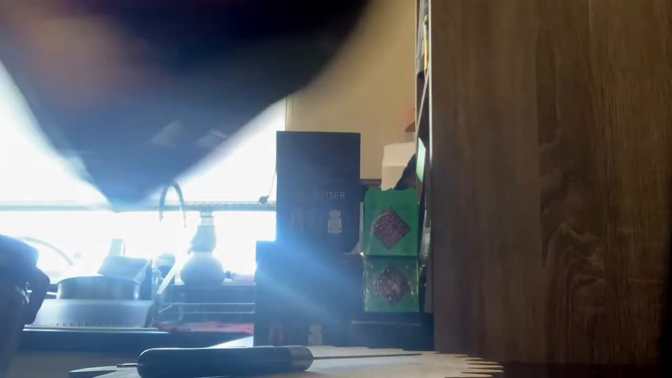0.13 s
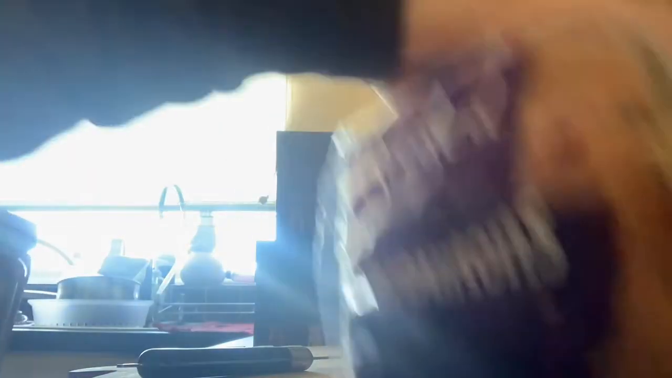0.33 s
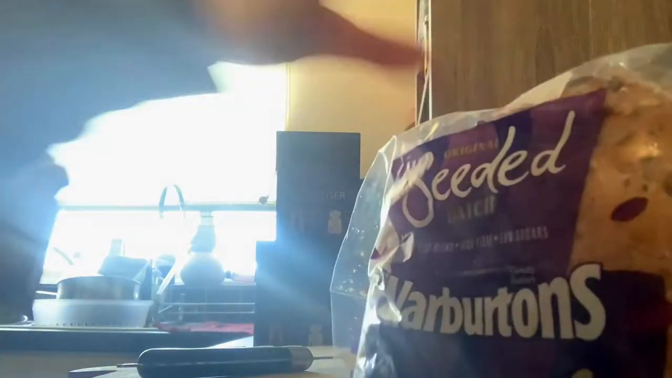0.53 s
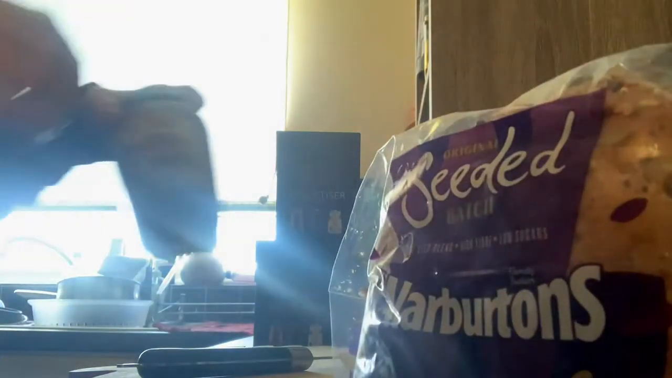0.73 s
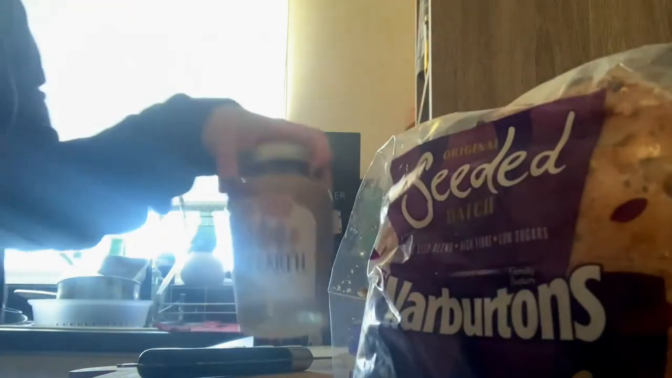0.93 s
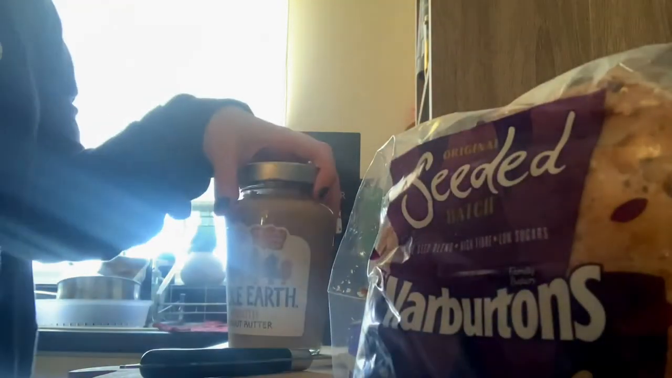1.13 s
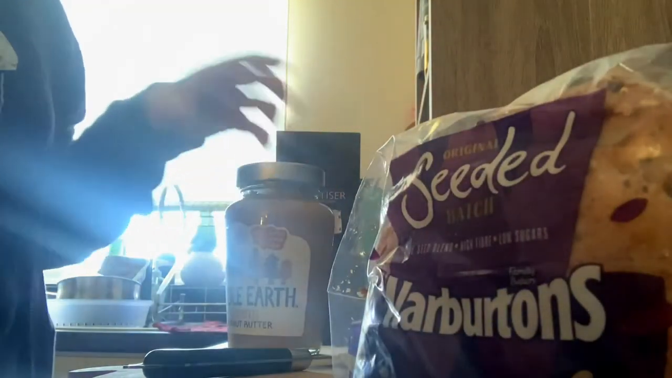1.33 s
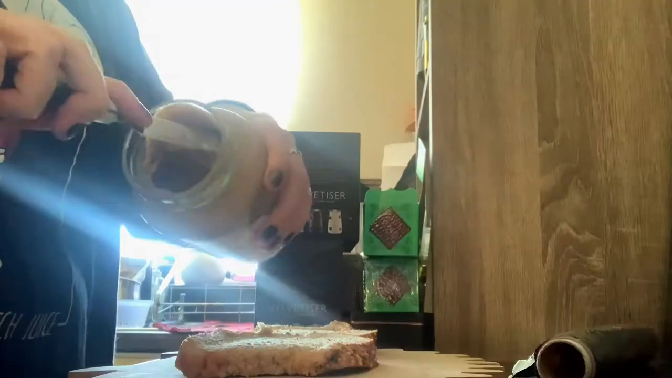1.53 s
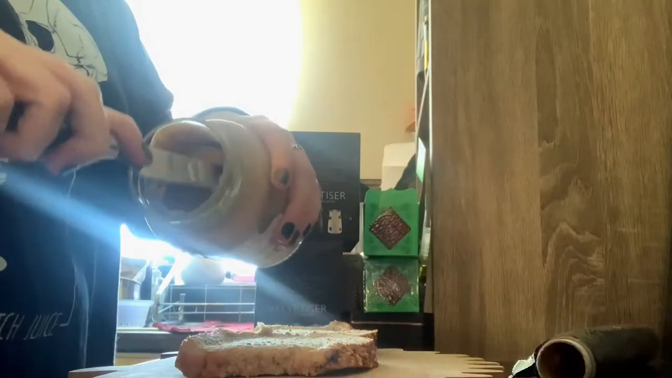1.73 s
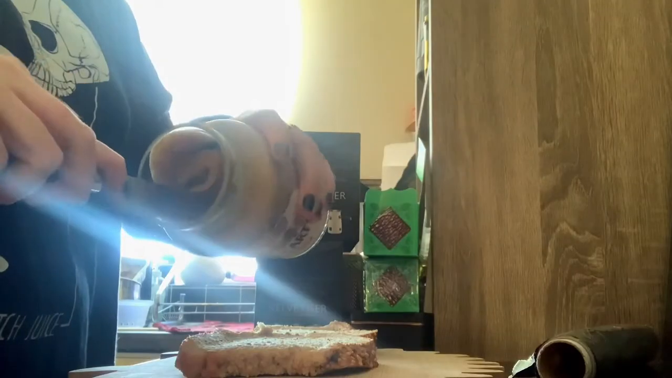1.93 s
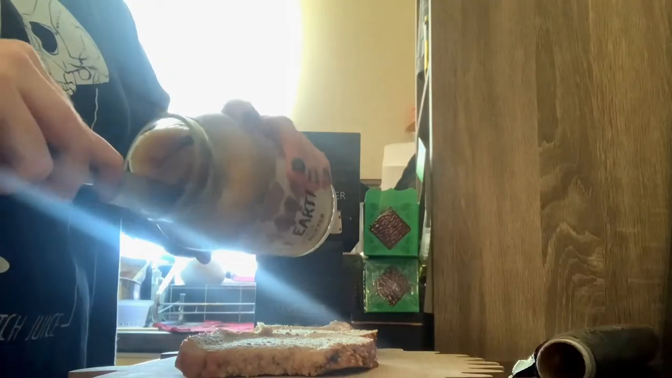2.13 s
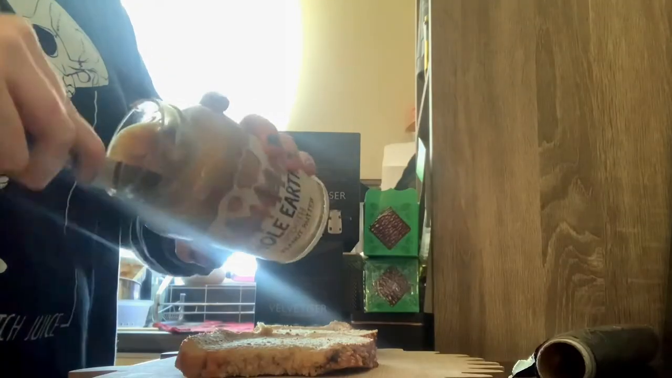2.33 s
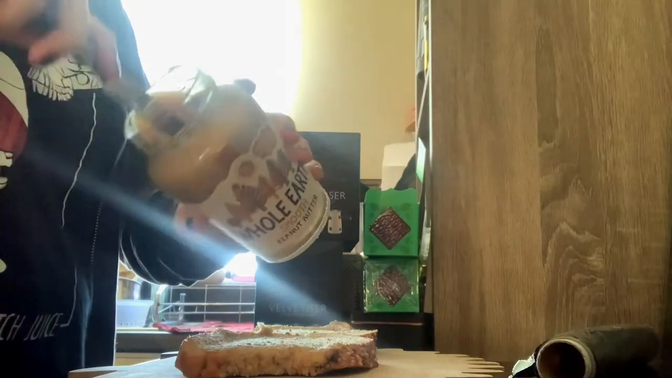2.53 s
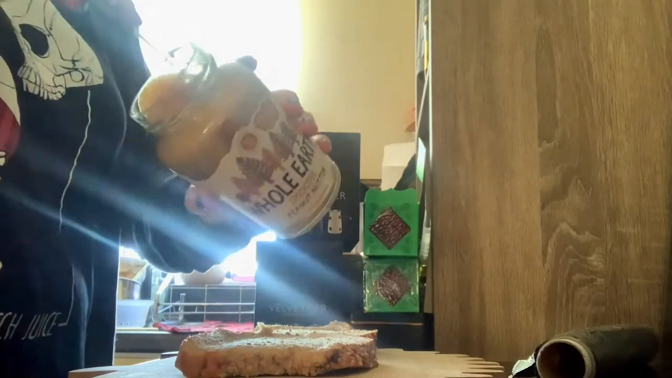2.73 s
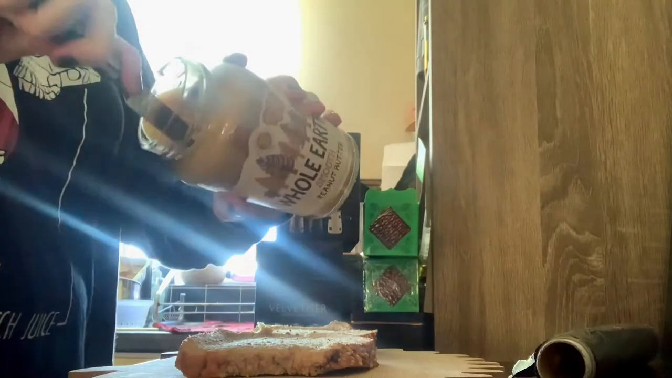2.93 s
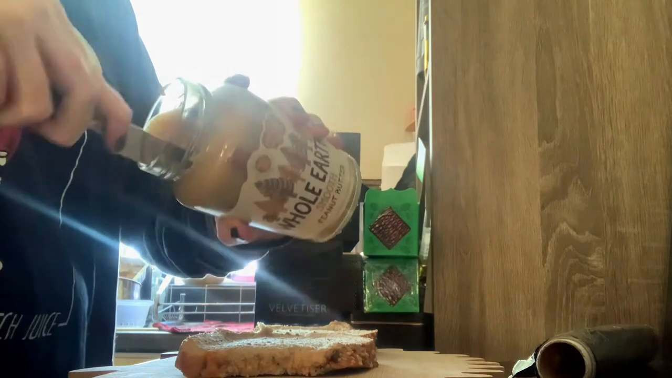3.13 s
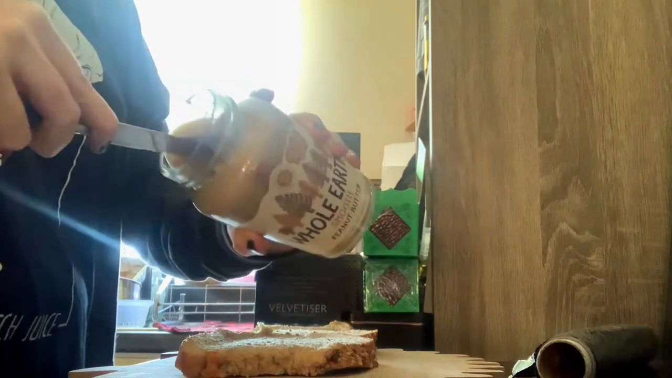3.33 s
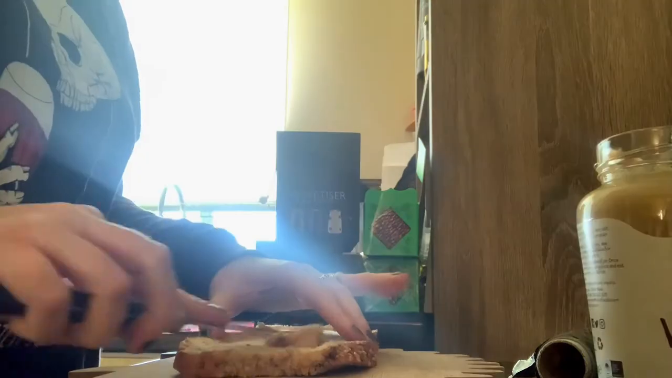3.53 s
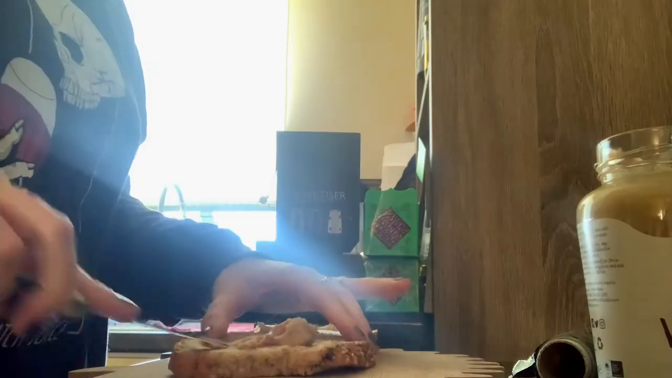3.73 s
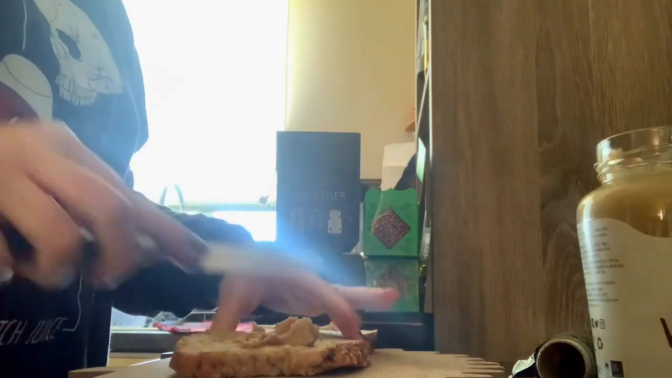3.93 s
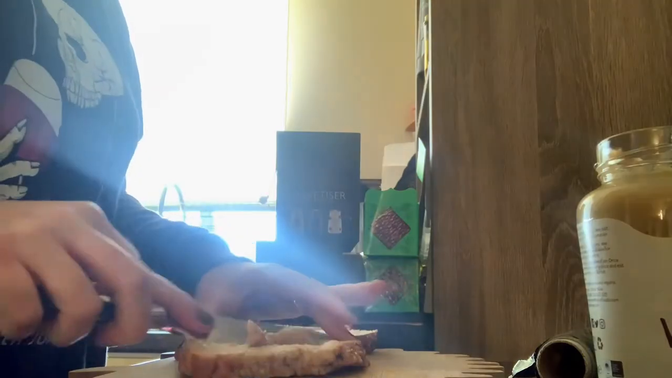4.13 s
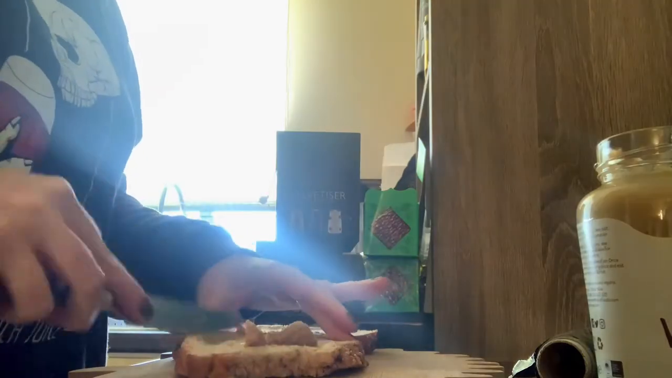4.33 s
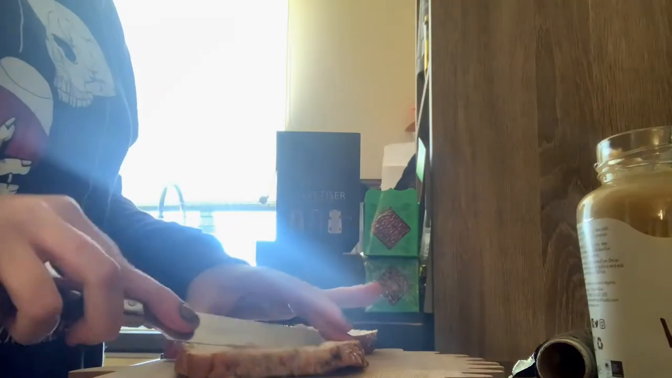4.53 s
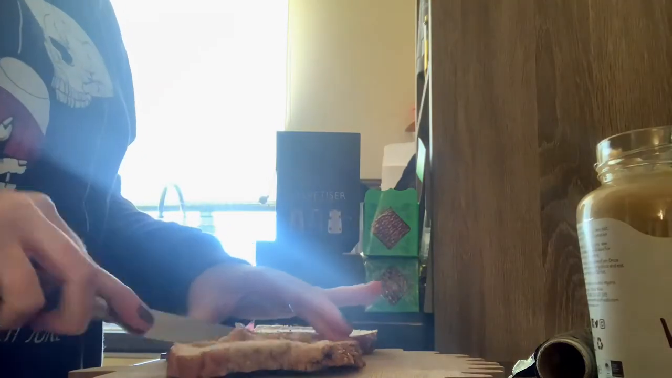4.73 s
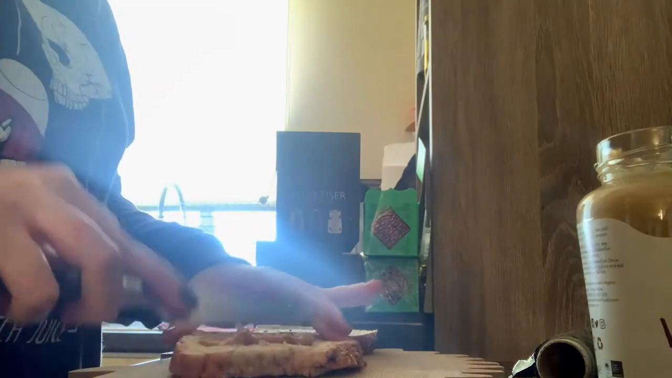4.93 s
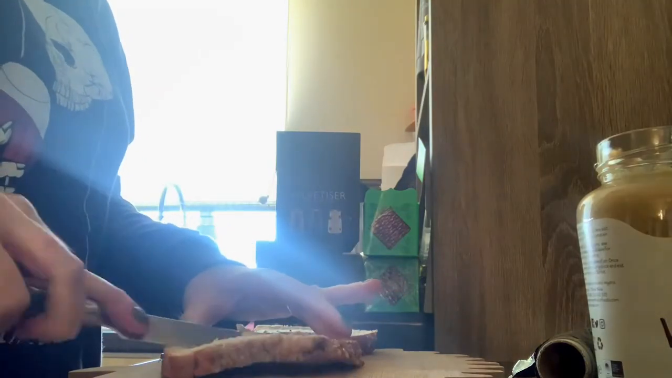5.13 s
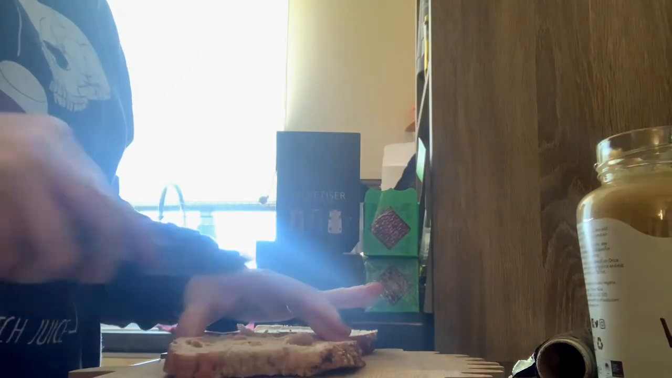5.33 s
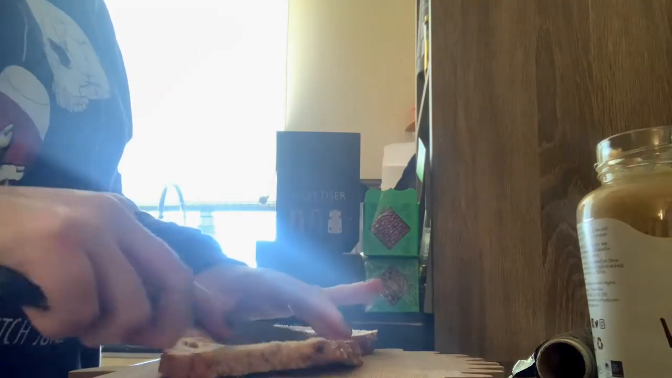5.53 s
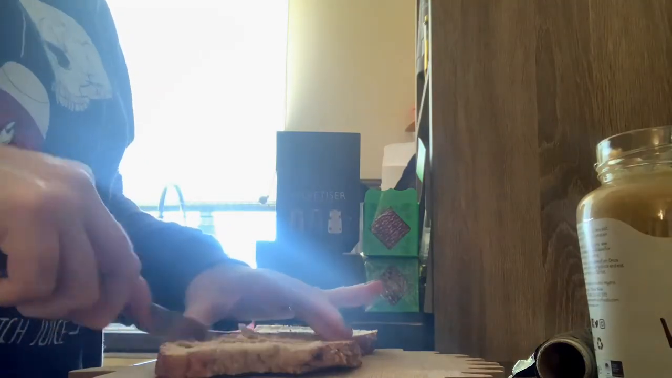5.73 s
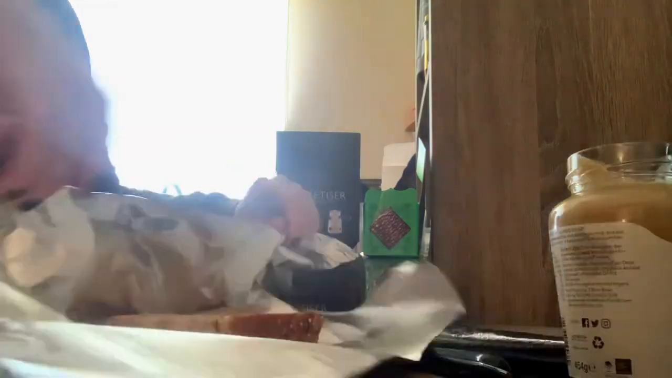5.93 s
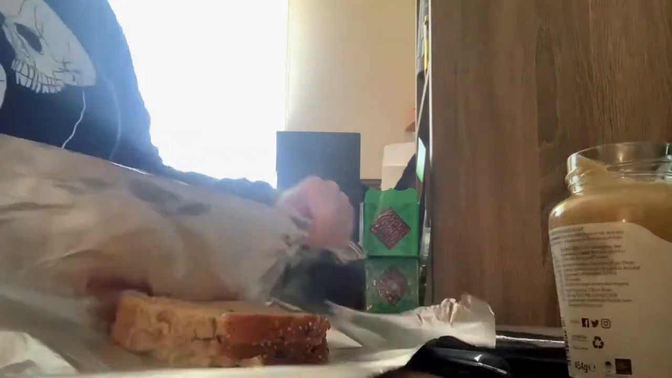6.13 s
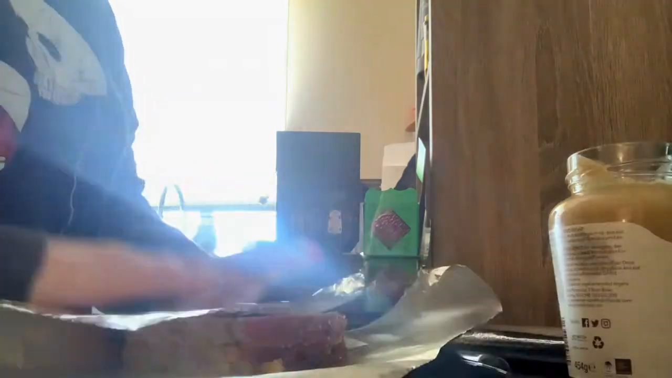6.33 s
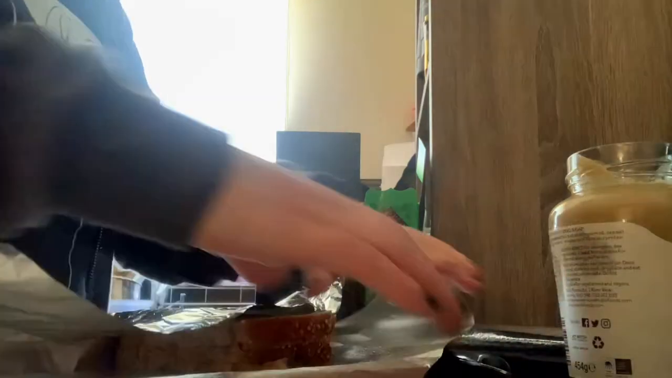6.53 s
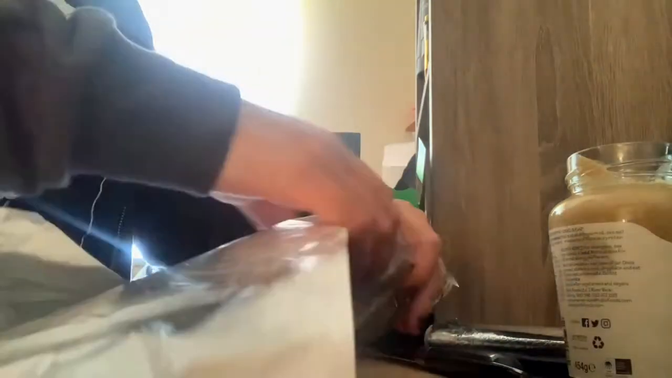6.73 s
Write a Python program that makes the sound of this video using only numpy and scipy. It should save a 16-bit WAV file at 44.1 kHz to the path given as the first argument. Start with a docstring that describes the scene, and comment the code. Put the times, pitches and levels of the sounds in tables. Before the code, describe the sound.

Close kitchen counter sounds: plastic rustle, hard jar thud and rattle, sparse knife clinks, very quiet spreading with light bumps, and crisp foil crumpling.

```python
"""A sandwich is made on a wooden counter, close to the two microphone ports of a phone. A bread bag rustles
(snapping creases in noise) and drops, then a full glass jar lands hard and rocks (ringing modes of the counter).
A knife clinks and scrapes in the jar (dry cracks with weaker short rings), then spreads quietly on bread
(soft crackle, squeaky noise tones) among light thumps; last, foil crackles by snapping creases.
Throughout, a small hard kitchen rings after each sound (a tail of echoes) over a low appliance drone (noise)."""
import sys
import numpy as np
from scipy import signal
from scipy.fft import rfft, irfft
from scipy.io import wavfile

SR = 44100
rng = np.random.default_rng(int(sys.argv[2]) if len(sys.argv) > 2 else 0)


def transcribe(u):
    """Save the signal u as a 16-bit wav file named by the first command-line argument.

    u: samples, shape (n,) or (channels, n), limited to [-1, 1]; the rate is SR.
    q: integer samples, one column per channel.
    """
    v = np.clip(np.atleast_2d(u).T, -1, 1)
    q = np.round(v * 32767).astype(np.int16)
    wavfile.write(sys.argv[1], SR, q)


N = 303408  # samples

PORT_LAG_US = 22.4  # the sound reaches the left port first
MODE_SPREAD_DB, MODE_DETUNE = 2.0, 0.016  # scatter of each mode from blow to blow: level, share of its pitch
BAG_PAN_DB = -1  # every pan is left minus right


def undb(db):
    """Decibels to amplitude."""
    return 10 ** (np.asarray(db) / 20)


def unit(x):
    """Scale to an RMS of 1, over both ports together."""
    return x / np.sqrt(np.mean(x ** 2))


def peak(x):
    """Scale to a peak of 1."""
    return x / np.abs(x).max()


def colour(x, points, tilt_db=0.0):
    """Filter by (pitch_hz, gain_db) points, tilted by tilt_db per octave about 4 kHz."""
    hz = np.maximum(np.fft.rfftfreq(x.shape[-1], 1 / SR), 1)
    point_hz, point_db = np.transpose(points)
    gain_db = np.interp(np.log(hz), np.log(point_hz), point_db) + tilt_db * np.log2(hz / 4000)
    return irfft(rfft(x) * undb(gain_db), x.shape[-1])


def ports(x, pan_db=0.0, lag_us=PORT_LAG_US):
    """One sound at the two microphone ports: the right one hears it lag_us later."""
    hz = np.fft.rfftfreq(len(x), 1 / SR)
    late = irfft(rfft(x) * np.exp(-2j * np.pi * hz * lag_us * 1e-6), len(x))
    return np.array([x * undb(pan_db / 2), late * undb(-pan_db / 2)])


def add(out, start_s, x):
    """Mix a two-port sound into out, cut off at the end."""
    i = int(start_s * SR)
    out[:, i:i + x.shape[1]] += x[:, :N - i]


def ring(modes, push, seconds):
    """Decaying modes driven by a short push; every blow lands on another spot; peak 1."""
    hz, db, t60 = np.transpose(modes)[:, :, None]
    level_chance, pitch_chance = rng.standard_normal((2, len(modes), 1))
    t = np.arange(int(seconds * SR)) / SR
    decay = undb(db + MODE_SPREAD_DB * level_chance - 60 * t / np.maximum(t60, 0.004))
    free = decay * np.sin(2 * np.pi * hz * (1 + MODE_DETUNE * pitch_chance) * t)
    return peak(signal.fftconvolve(free.sum(0), push)[:len(t)])


def chatter(rise_ms, fall_ms, seconds, points=((100, 0), (200, 0))):
    """Rough contact: a burst of coloured noise that swells and dies within milliseconds."""
    ms = np.arange(int(seconds * SR)) * 1000 / SR
    noise = colour(rng.standard_normal(len(ms)), points)
    return noise * (1 - np.exp(-ms / rise_ms)) * np.exp(-ms / fall_ms)


def crackle(curve, points, rate, spread_db, shiver_ms, pan_db):
    """Creases snap at random and the sheet shivers after each; wide, middling and fine creases lie apart."""
    s, db, brightness = np.transpose(curve)
    t = s[0] + np.arange(int((s[-1] - s[0]) * SR)) / SR
    share = np.clip(np.interp(t, s, brightness), 0, 1)
    sheet = 0
    for hz, lag_us in ((900, 11.0), (3000, 39.0), (6000, 21.0), (6000, 86.0), (11000, 33.0)):
        happens = rng.random(len(t)) < rate / SR  # rate: snaps per second in each layer
        strength = rng.standard_normal(len(t)) * undb(spread_db * rng.exponential(size=len(t)))
        envelope = signal.lfilter([1], [1, -np.exp(-1000 / (shiver_ms * SR))], np.abs(happens * strength))
        shiver = rng.standard_normal(len(t)) * envelope
        crease = colour(unit(shiver), [(hz / 4, -9), (hz, 0), (hz * 4, -9)])
        sheet = sheet + ports(crease, pan_db, lag_us)
    dull = unit(colour(sheet, points, -4.0))
    bright = unit(colour(sheet, points, 4.0))
    mixed = unit(dull * (1 - share) + bright * share)
    out = np.zeros((2, N))
    add(out, max(s[0], 0), mixed * undb(np.interp(t, s, db)))
    return out


def thumps():
    """A half-sine push rings slab and board, a slower smooth heave the cabinet; a noise burst adds the crack."""
    # things set down or pressed on the counter: start_s, slab_peak_db,
    # then against the slab: cabinet_db, board_db, crack_db
    blows = [(0.186, -51, 0, 13.5, 12.5), (0.245, -32, 0, -12, 5), (0.261, -21.5, 4.5, -7, -14),
             (0.276, -25.5, 11, 6, -11.5), (0.374, -28.5, -11, -18, -9), (0.565, -46.5, -4, 4, 3.5),
             (0.629, -49, 1, -10, 9.5), (0.796, -54.5, 0, -11, 7), (0.832, -47.5, -9, -6.5, 10.5),
             (0.878, 4, -27, -13.5, -8.5), (0.886, -2.5, 1, 8, -14), (0.902, -2.5, -17, -6.5, -9),
             (0.92, -13.5, -14.5, 2, -3), (0.961, -2.5, -28, -15, -27), (0.984, -12.5, -16, -17, -35.5),
             (1.017, -24.5, -13.5, 2.5, -12.5), (1.04, -27, -11, -3.5, -17), (3.386, -39.5, -1, -6, -13.5),
             (3.924, -47, 8, -12, -13.5), (4.41, -50.5, 6, -10, -19), (4.685, -36, -18, -22.5, -20.5),
             (4.869, -24, -7.5, -7.5, -43), (4.92, -41, 3, -15, -17.5), (5.23, -44, -4, -1, -24),
             (5.35, -56, 8, -11, -14.5), (5.494, -47, -14, -0.5, -10.5), (5.642, -37.5, -15.5, -6, -7.5),
             (6.04, -29, -2, -8, -6.5), (6.291, -43, 5, -6, 4)]
    # modes of the counter's parts: pitch_hz, level_db, t60_s
    cabinet = [(55, -4, .07), (68, 0, .075)]
    slab = [(135, 2, 0.1), (171, -2.5, 0.085), (233.6, -6.5, 0.15), (292, -17, 0.13), (354, -13.5, 0.118)]
    board = [(440.6, -2.5, 0.026), (536, 1.5, 0.036), (648, -2.5, 0.036), (815.8, -4.5, 0.077),
             (940, -24.5, .04), (1300, -9.5, 0.032)]
    # colour of the crack: pitch_hz, gain_db
    crack_colour = [(400, -2.5), (1300, -3), (2400, -6.5), (4000, -13.5), (8000, -28.5), (14000, -36.5)]
    contact_ms, pan_db = 1.4, -0.3
    slab_pan_spread_db = 4.0  # each blow shakes the slab from another side
    slab_lag_us = 1384  # bending waves in the slab shake the two ends of the phone out of step
    out = np.zeros((2, N))
    span = contact_ms * SR / 1000
    push = np.sin(np.pi * np.minimum((np.arange(int(span) + 1) + 0.5) / span, 1))
    heave = np.hanning(int(0.007 * SR))  # the heavy cabinet follows the blow slowly
    for start_s, db, cabinet_db, board_db, crack_db in blows:
        direct = undb(cabinet_db) * ring(cabinet, heave, 0.3)
        direct = direct + undb(board_db) * ring(board, push, 0.3)
        direct = direct + undb(crack_db) * peak(chatter(0.4, 6.6, 0.3, crack_colour))
        slab_pan_db = pan_db + slab_pan_spread_db * rng.standard_normal()
        shaken = ports(ring(slab, push, 0.3), slab_pan_db, slab_lag_us)
        add(out, start_s, undb(db) * (ports(direct, pan_db) + shaken))
    return out


def clinks():
    """Steel chatters on a food-damped jar: a dry crack in each part's band, together with a weaker short ring."""
    # knife meets jar: start_s, blade_peak_db (before the bass cut),
    # then against the blade: jar_wall_db, rim_db, edge_tick_db
    hits = [(1.2845, -49, -1, 3, 8), (1.561, -54.5, -3, -2, 6), (1.6153, -46.5, -4, -4, -4.5),
            (1.7477, -9, -22, -12, 1.5), (1.755, -27, -10, -2, 14), (1.7582, -36, -18, 14.5, -0.5),
            (2.1248, -53.5, -2, -14.5, -10), (2.1333, -51.5, -4, -5, 1), (2.233, -42, -16, -10, -2.5),
            (2.267, -37, -6, -10, -2), (2.3209, -34, -14, -7, -2.5), (2.363, -30.5, -18.5, -9, 2),
            (2.428, -49, 5.5, -6.5, -15), (2.584, -38, -12, -7, 12), (2.5965, -51, 8.5, 10, 3.5),
            (2.616, -37.5, 10.5, 8, 9), (2.6638, -36, 20.5, 6.5, 11.5), (2.6944, -53, 22, -5, 2),
            (2.709, -43, 19.5, 14.5, 12), (2.7178, -38.5, 14, -2, -7), (2.7264, -38, 13, 5.5, 0.5),
            (2.9899, -46.5, -4, -22.5, -17.5), (3.0798, -51.5, -10.5, -6, 2.5),
            (3.1194, -43.5, -20, -8.5, 1.5), (4.2237, -47, -17.5, -15, -11.5),
            (4.7528, -59.5, 4, 7.5, 13.5), (5.4948, -52, 1, -5, 9)]
    # each part: its modes (pitch_hz, level_db, t60_s), then the band of its crack (low_hz, high_hz)
    blade = ([(1980, -2, .012), (2240, 0, .015), (2730, -2, .015), (3050, -3, .012)], (1750, 3100))
    jar_wall = ([(620, -4, .02), (1000, -6, .015), (1140, -1, .025), (1320, 0, .025), (1490, -2, .045)],
                 (900, 1600))
    rim = ([(4720, 0, .025), (5050, -6, .012)], (4350, 5300))
    edge = ([(7900, -5, .006), (9500, 0, .016), (12500, -2, .012)], (6500, 13500))
    rise_ms, contact_ms, pan_db = 0.79, 0.9, -1.5
    out = np.zeros((2, N))
    thin = signal.butter(2, 380, "high", fs=SR, output="sos")  # small things radiate no bass
    for start_s, db, wall_db, rim_db, edge_db in hits + scrape():
        blow = 0
        for (modes, band), part_db in ((blade, 0), (jar_wall, wall_db), (rim, rim_db), (edge, edge_db)):
            push = chatter(rise_ms, contact_ms, 0.08)
            band_filter = signal.butter(3, band, "band", fs=SR, output="sos")
            crack = peak(signal.sosfilt(band_filter, push))
            tone = ring(modes, np.hanning(9) * push[20:29], 0.08)  # driven by a snippet of the chatter
            blow = blow + undb(db + part_db) * peak(crack + 0.55 * tone)
        add(out, start_s, ports(signal.sosfilt(thin, blow), pan_db))
    return out


def scrape():
    """The blade drags round the jar wall in quickening, fading slips, uneven in time and strength."""
    slips, start_s, end_s, quicken = 7, 2.7387, 2.7556, 0.85
    first_db, last_db = -35, -40  # blade
    parts_db = (8, 5, 4)  # jar wall, rim, edge against the blade
    along = np.linspace(0, 1, slips)
    time_chance, level_chance = rng.standard_normal((slips, 2)).T
    s = start_s + (end_s - start_s) * along ** quicken + 0.0008 * time_chance
    db = first_db + (last_db - first_db) * along + 2.1 * level_chance
    return [(slip_s, slip_db, *parts_db) for slip_s, slip_db in zip(s, db)]


def bread_bag():
    """The bag's thin sheet rustles as many creases snap."""
    # crumpling: time_s, level_db, brightness (0-1)
    crumpling = [(0.0, -43.5, 0.74), (0.118, -35.5, 0.75), (0.174, -51, 1), (0.246, -35, 0.6),
                 (0.268, -23, 0.61), (0.362, -45, 0.7), (0.442, -47, 0.8), (0.504, -59.5, 0.33),
                 (0.72, -60, 0.36)]
    # colour of the sheet: pitch_hz, gain_db
    sheet_colour = [(88, -45), (150, -6), (439, -5.5), (612, -0.5), (871, -11.5), (979, -7), (1190, -8),
                    (2650, -15.5), (11300, -20), (16000, -33)]
    return crackle(crumpling, sheet_colour, 700, 2.7, 0.6, BAG_PAN_DB)


def pops():
    """Lone stiff creases of the bag flip with a tick: a very short noise burst around one pitch."""
    # single creases: start_s, peak_db, pitch_hz
    creases = [(0.0568, -33.5, 8800), (0.0842, -34, 5190), (0.2004, -29, 12100), (0.2059, -33, 7100),
               (0.2252, -23, 9400), (0.2577, -12, 12700), (0.2583, -21, 6370), (0.5631, -43, 4710)]
    out = np.zeros((2, N))
    for start_s, db, hz in creases:
        tick = peak(chatter(0.2, 0.693, 0.02, [(hz / 3, -20), (hz, 0), (hz * 2, -12)]))
        add(out, start_s, ports(undb(db) * tick, BAG_PAN_DB))
    return out


def foil():
    """Foil crackles as its creases snap, more densely than the bag's."""
    # crumpling: time_s, level_db, brightness (0-1)
    crumpling = [(5.755, -78, 0.45), (5.775, -50, 0.63), (5.801, -35.5, 0.42), (5.807, -22.5, 0.48),
                 (5.907, -26.5, 0.59), (5.919, -22.5, 0.54), (5.987, -29.5, 0.39), (6.083, -19.5, 0.46),
                 (6.133, -21, 0.5), (6.189, -27, 0.46), (6.255, -48, 0.6), (6.293, -25, 0.21),
                 (6.331, -27.5, 0.28), (6.443, -35, 0.41), (6.49, -52, 0.45), (6.518, -41, 0.46),
                 (6.56, -29.5, 0.69), (6.744, -27, 0.61), (6.88, -26.5, 0.34)]
    # colour of the sheet: pitch_hz, gain_db
    sheet_colour = [(24, -47.5), (40, -13), (130, -8.5), (277, -9.5), (357, -4), (385, -5.5), (905, -5),
                    (976, -4), (1160, -3), (2020, 2), (12100, 9.5), (15100, 9.5), (16300, -47)]
    return crackle(crumpling, sheet_colour, 2000, 1.4, 0.8, -0.8)


def spreading():
    """The knife rubs over the bread: a soft crackle that follows the strokes."""
    # colour of the rubbing: pitch_hz, gain_db
    rub_colour = [(200, -26), (500, 8.5), (1000, -1.5), (1650, -3.5), (2500, -6.5), (5000, -16.5),
                  (10000, -35), (16000, -30)]
    return crackle(strokes(), rub_colour, 500, 2.3, 0.973, -1.11)


def strokes():
    """Level of the spreading knife: every stroke swells and fades at its own pace, powers added."""
    # knife strokes: loudest_s, level_db, swell_s and fade_s (time for 20 dB; below 0.005 acts as 0.005)
    knife_strokes = [(3.336, -66.5, 0.09, -0.3), (3.394, -63, .08, -0.2), (3.55, -63, .04, 0.3),
                     (3.748, -65, 0.62, 0.5), (4.032, -55.5, 0.19, 0.08), (4.19, -61.5, .25, 0.1),
                     (4.374, -67.5, 0.048, -0.3), (4.7, -52.5, .1, .05), (4.87, -65.5, .02, .22),
                     (5.162, -66, .22, -0.2), (5.23, -64.5, .02, -0.4), (5.5, -54.5, 0.025, -0.08),
                     (5.648, -58.5, .08, 0)]
    brightness = 0.44
    s, db, swell, fade = np.transpose(knife_strokes)[:, :, None]
    t = np.arange(s.min() - 0.2, s.max() + 0.2, 0.002)
    before = (s - t) / np.maximum(swell, 0.005)
    after = (t - s) / np.maximum(fade, 0.005)
    each_db = db - 20 * np.where(t < s, before, after)
    level_db = 10 * np.log10(np.sum(undb(2 * each_db), axis=0))
    return np.transpose([t, level_db, brightness + 0 * t])


def squeaks():
    """The blade squeaks as it sticks in the spread: brief rough tones of narrow noise swell and fade."""
    # squeaks: loudest_s, half_length_s, pitch_hz, level_db (RMS before the swell and fade)
    tones = [(3.329, 0.054, 955, -64.5), (3.96, .04, 515, -58.5), (4.015, 0.059, 1006, -56),
             (4.178, 0.0954, 1682, -62.5), (4.233, 0.027, 2705, -70), (5.147, 0.062, 1680, -66.5),
             (5.513, .04, 1391, -64.5), (5.664, 0.0455, 414, -61)]
    out = np.zeros((2, N))
    for loudest_s, half_s, hz, db in tones:
        count = int(2 * half_s * SR)
        noise = rng.standard_normal(count)
        tone = unit(colour(noise, [(hz * 0.6, -30), (hz, 0), (hz * 1.2, -30)]))
        add(out, loudest_s - half_s, ports(undb(db) * tone * np.hanning(count), -1.45))
    return out


def room(x):
    """Tail of dense echoes, each band dying at its own rate; the ports share echoes mostly in the bass."""
    # bands of the kitchen's tail: centre_hz, t60_s, level_db
    bands = [(59.4, .45, -14), (250, .46, -8), (990.8, .36, -4.5), (3300, .25, -4.5), (9970, 0.13, -3)]
    t = np.arange(int(0.7 * SR)) / SR
    tail = 0
    for hz, t60, db in bands:
        shared, own = rng.standard_normal(len(t)), rng.standard_normal((2, len(t)))
        alike = np.clip(220 / hz, 0, 0.9)
        echoes = alike * shared + np.sqrt(1 - alike ** 2) * own
        band = colour(echoes, [(hz / 4, -30), (hz / 2, -3), (hz, 0), (hz * 2, -3), (hz * 4, -30)])
        fall = undb(-60 * t / t60) * np.clip(t / 0.0037, 0, 1)  # builds up over 3.7 ms
        tail = tail + undb(db) * band * fall / np.sqrt(np.sum(fall ** 2))
    return signal.fftconvolve(x[:1], tail, axes=1)[:, :N]  # the left port's sound feeds both tails


def drone():
    """Steady appliance noise, most alike at both ports near 300 Hz; narrow noise bands make wavering tones."""
    # colour of the drone: pitch_hz, gain_db
    drone_colour = [(12, -34), (20, -9), (58, -1.5), (304, -11.5), (402, -10.5), (450, -17.5), (504, -14),
                    (667, -19), (933, -18), (1240, -26), (2170, -25.5), (2420, -31), (11700, -33.5),
                    (15000, -36), (16300, -53.5)]
    # wavering tones: pitch_hz, width_hz, level_db (right port)
    hum = [(50.5, 18.6, -58.5), (501, 13, -72.5), (2174, 26, -81.5)]
    drone_db = -55.5
    mid, side = rng.standard_normal((2, N))
    side = colour(side, [(60, 2.5), (300, -8.5), (3000, -0.5)])
    pair = np.array([1.01 * (mid + side), mid - side])
    out = unit(colour(pair, drone_colour)) * undb(drone_db)
    for hz, width, db in hum:
        noise = rng.standard_normal(N)
        tone = unit(colour(noise, [(hz - width, -60), (hz, 0), (hz + width, -60)]))
        out = out + undb(db + np.array([[-1.5], [0]])) * tone  # left port, right port
    return out


def scene():
    """Everything on the counter, its echoes in the kitchen and the drone behind."""
    bag = pops() + bread_bag()
    spread = squeaks() + spreading()
    near = thumps() + clinks() + bag + foil() + spread
    return near + room(near) + drone()


def record(dry):
    """The phone's microphones drop the deepest bass, clip whatever passes 0.98 and cut the top."""
    top_hz = 16200
    bass_cut = signal.butter(2, 40, "high", fs=SR, output="sos")
    top_cut = signal.ellip(8, 0.2, 70, top_hz, fs=SR, output="sos")
    mic = signal.sosfilt(bass_cut, dry)
    return signal.sosfilt(top_cut, np.clip(mic, -0.98, 0.98))


dry = scene()
out = record(dry)
transcribe(out)
```